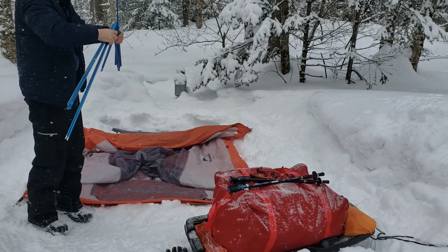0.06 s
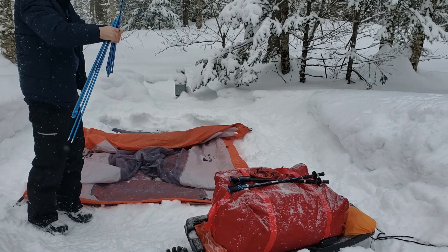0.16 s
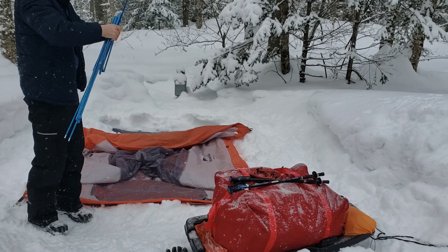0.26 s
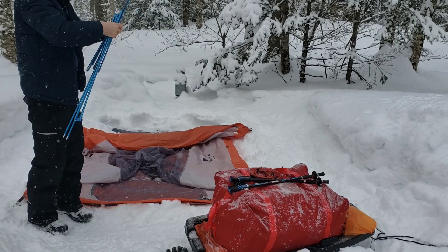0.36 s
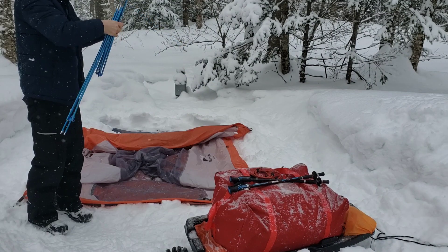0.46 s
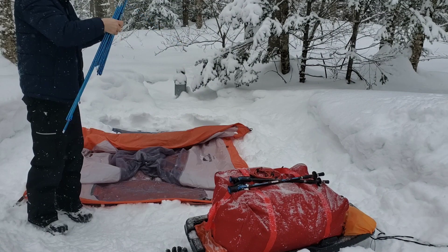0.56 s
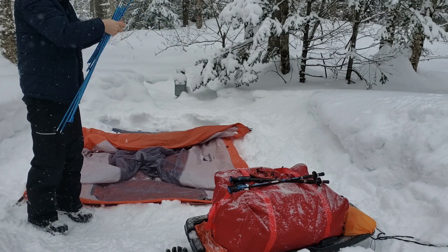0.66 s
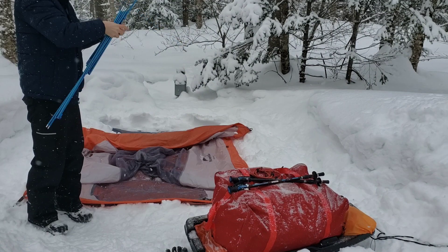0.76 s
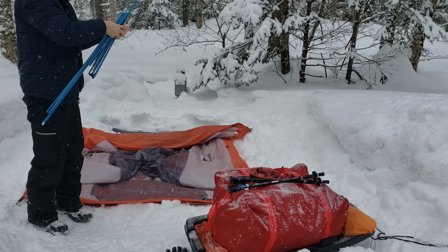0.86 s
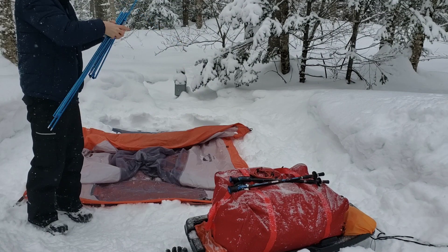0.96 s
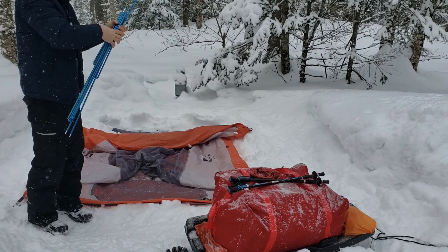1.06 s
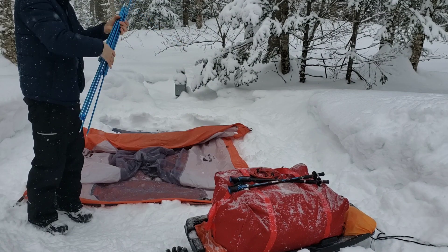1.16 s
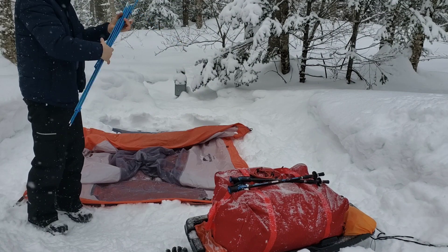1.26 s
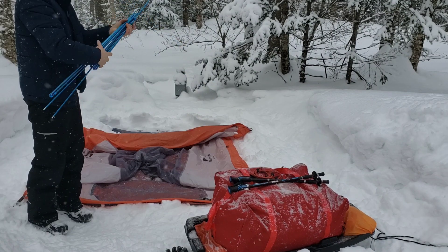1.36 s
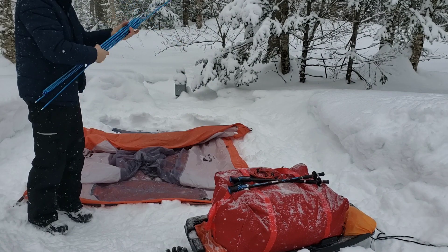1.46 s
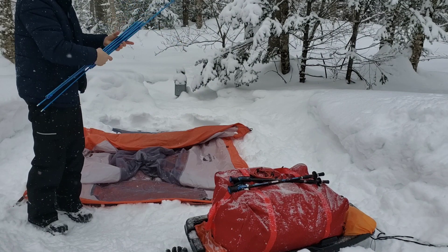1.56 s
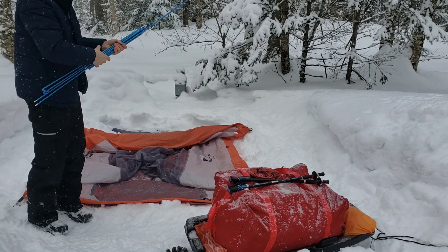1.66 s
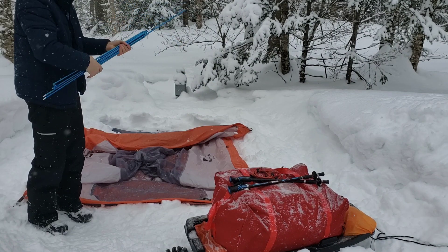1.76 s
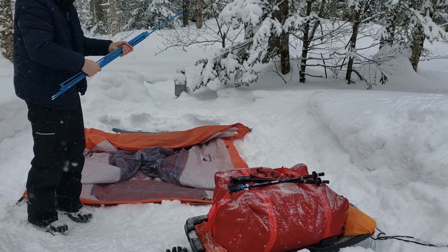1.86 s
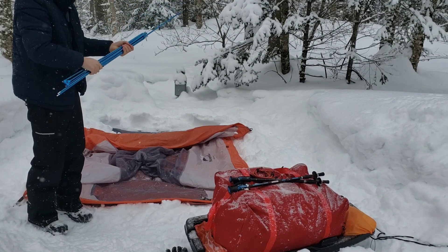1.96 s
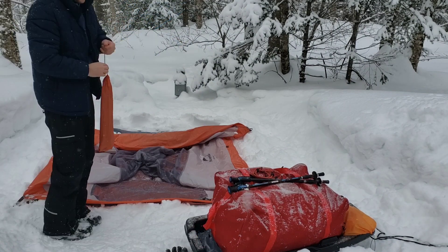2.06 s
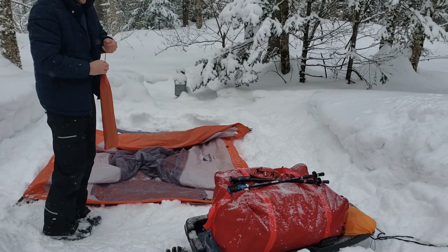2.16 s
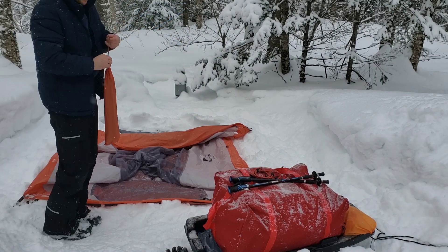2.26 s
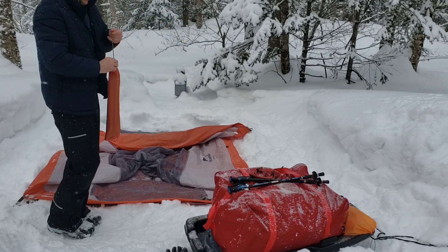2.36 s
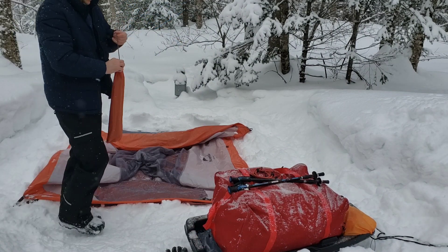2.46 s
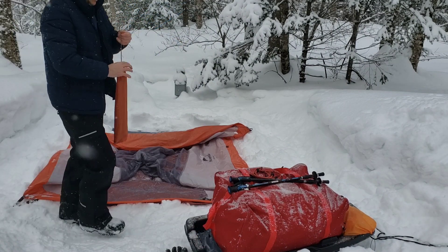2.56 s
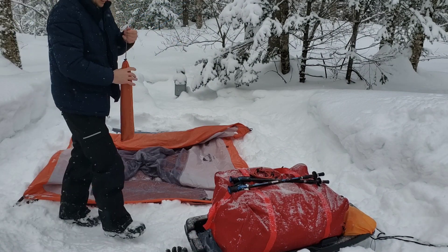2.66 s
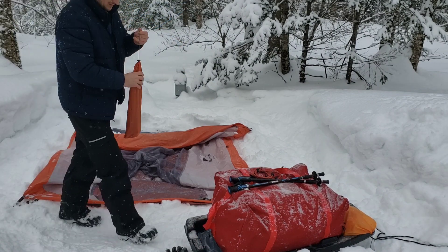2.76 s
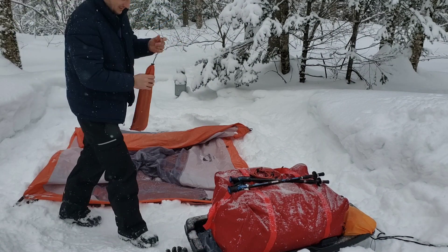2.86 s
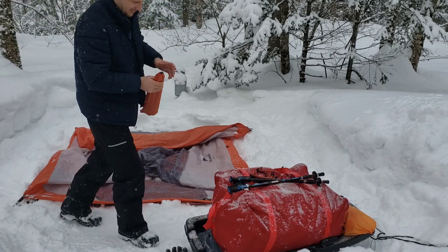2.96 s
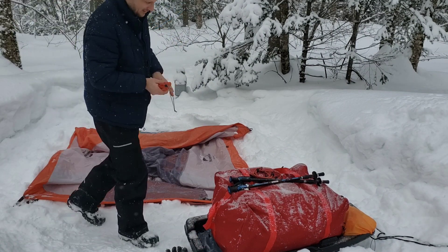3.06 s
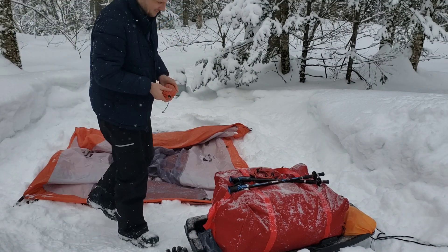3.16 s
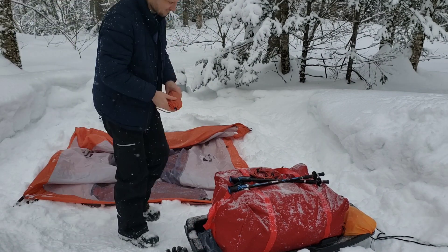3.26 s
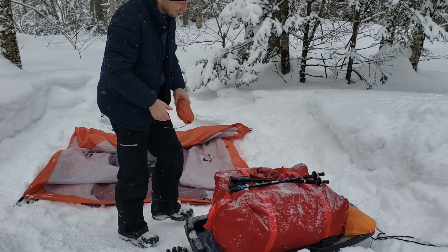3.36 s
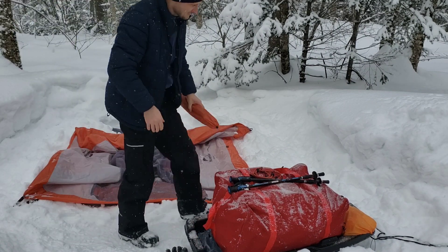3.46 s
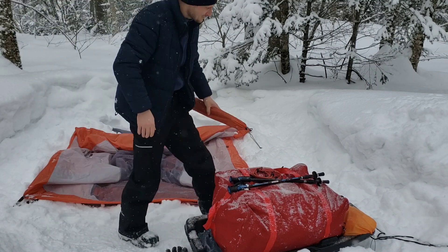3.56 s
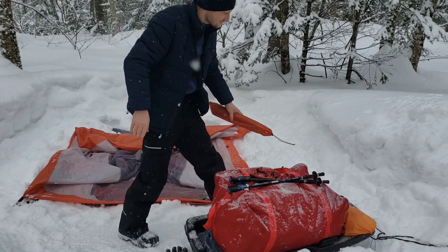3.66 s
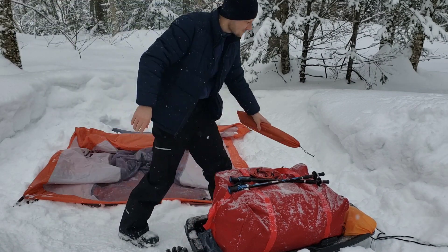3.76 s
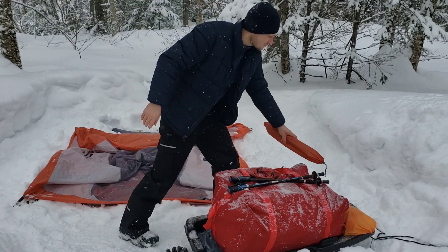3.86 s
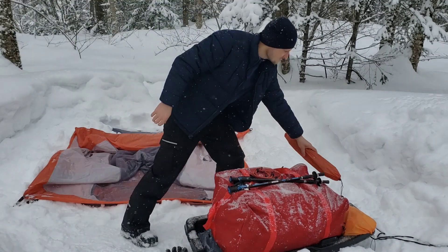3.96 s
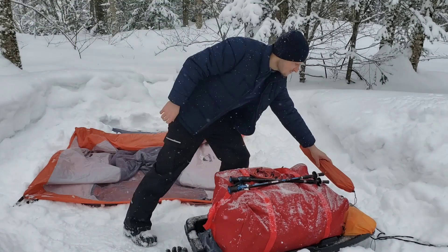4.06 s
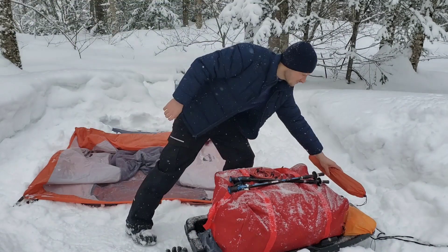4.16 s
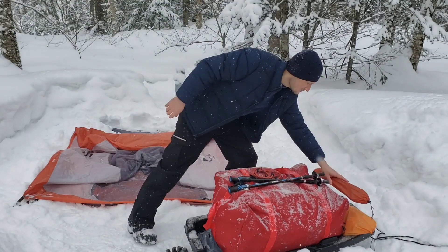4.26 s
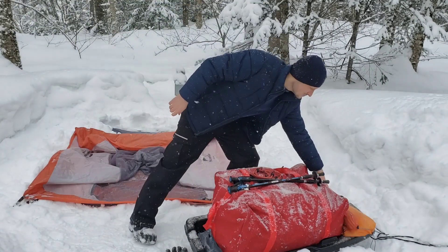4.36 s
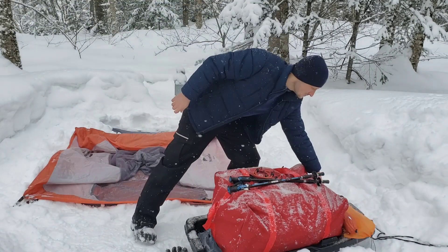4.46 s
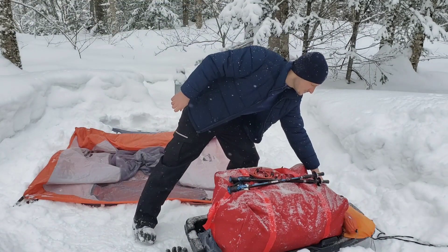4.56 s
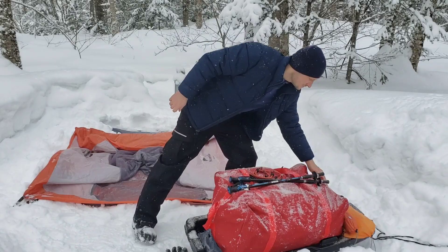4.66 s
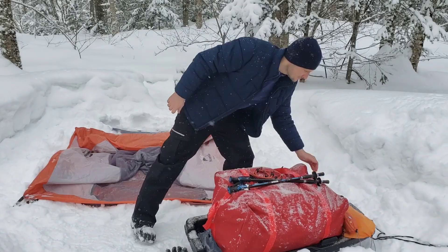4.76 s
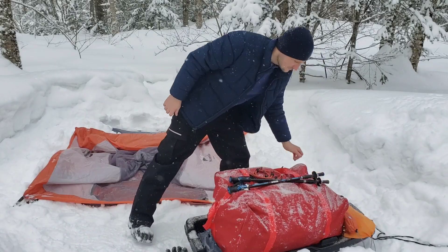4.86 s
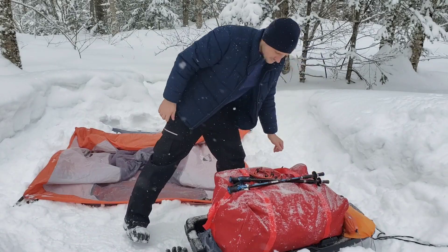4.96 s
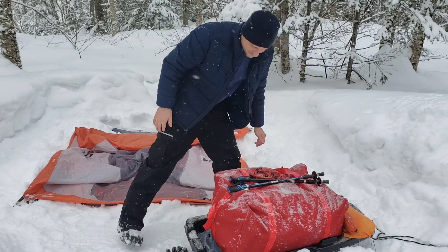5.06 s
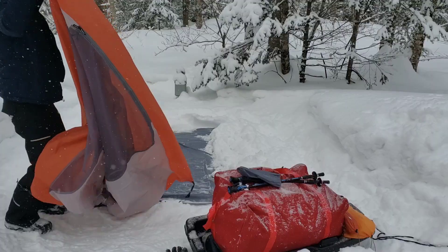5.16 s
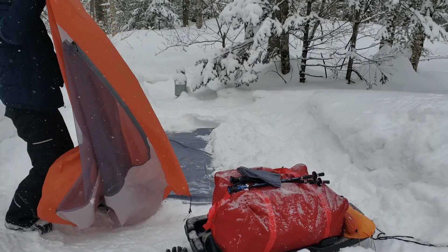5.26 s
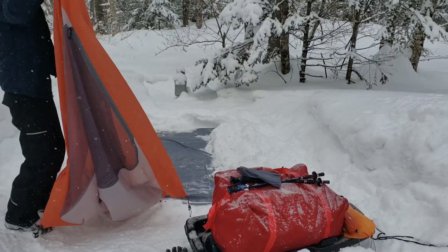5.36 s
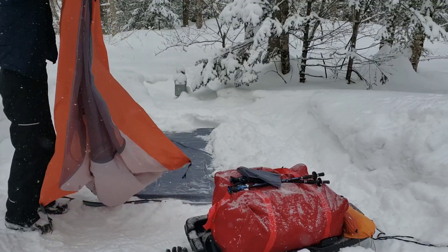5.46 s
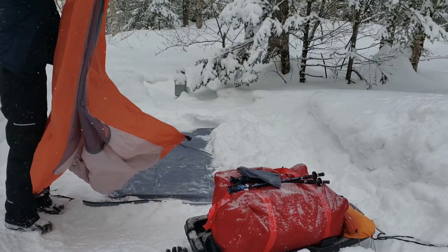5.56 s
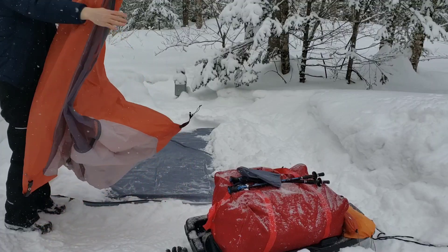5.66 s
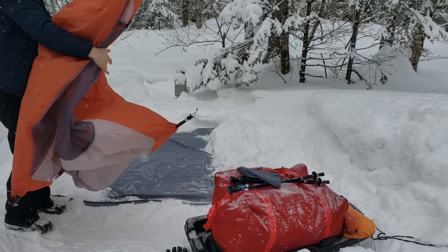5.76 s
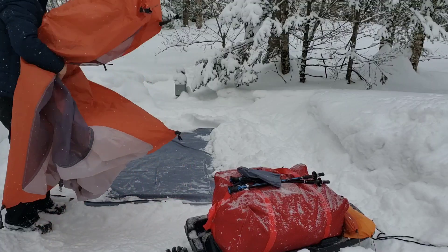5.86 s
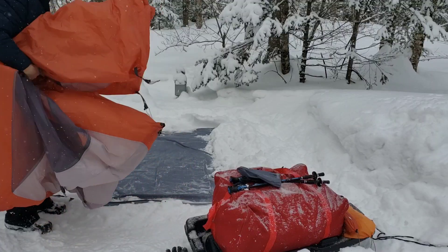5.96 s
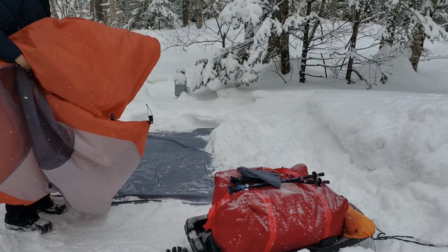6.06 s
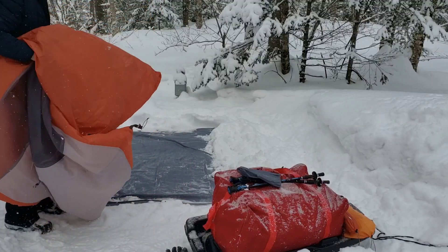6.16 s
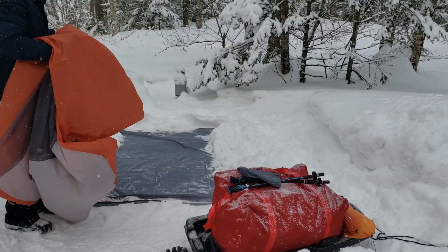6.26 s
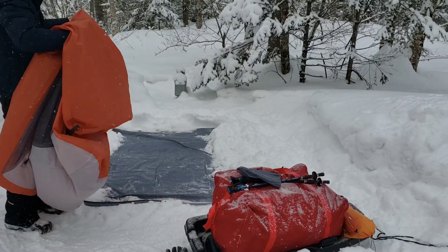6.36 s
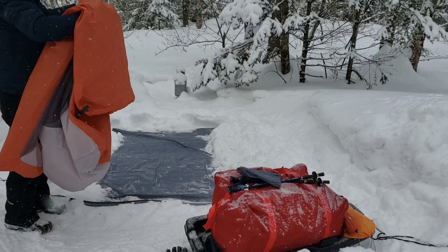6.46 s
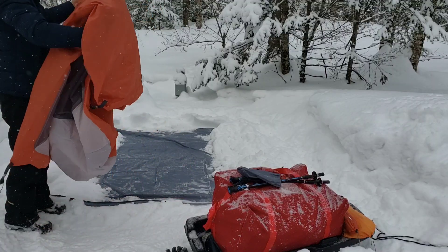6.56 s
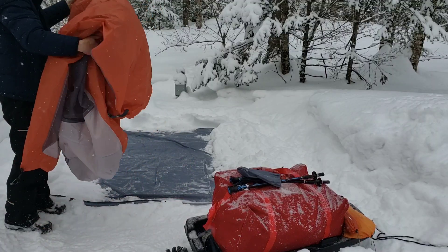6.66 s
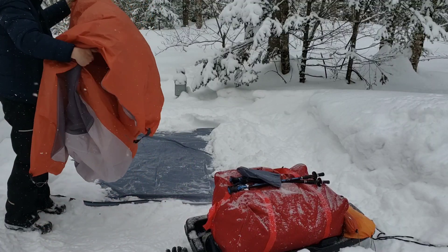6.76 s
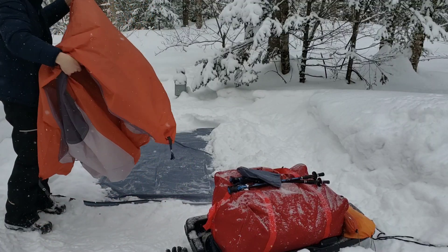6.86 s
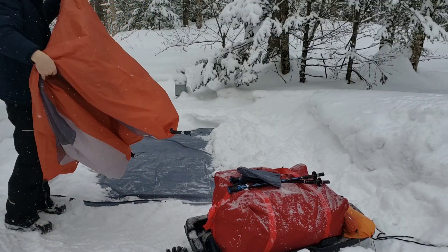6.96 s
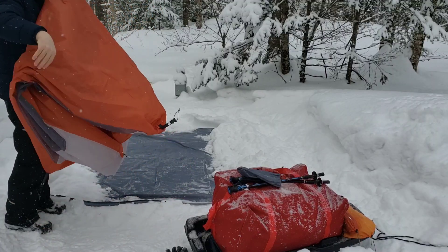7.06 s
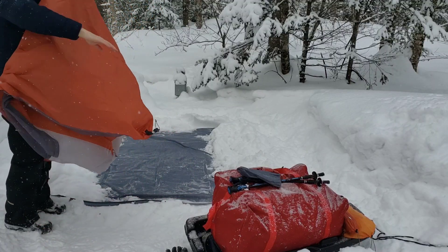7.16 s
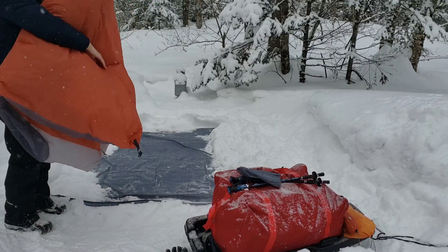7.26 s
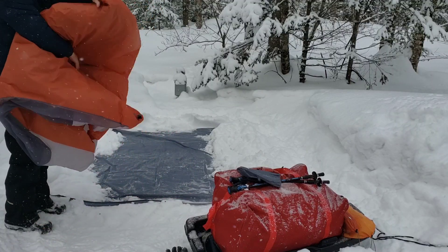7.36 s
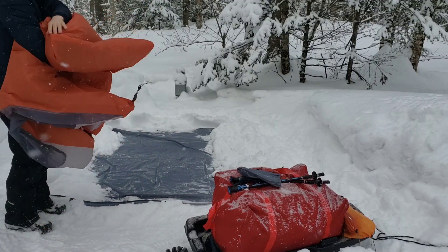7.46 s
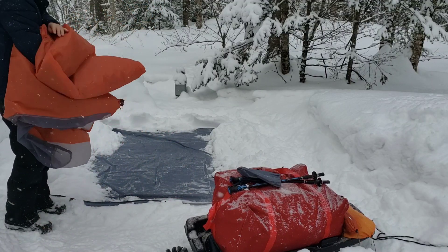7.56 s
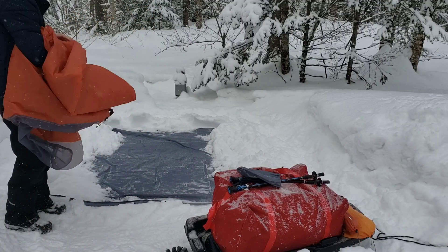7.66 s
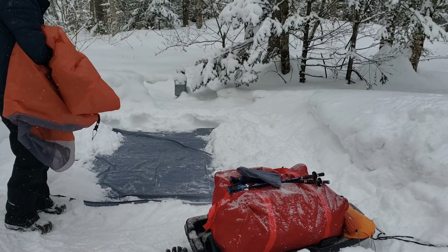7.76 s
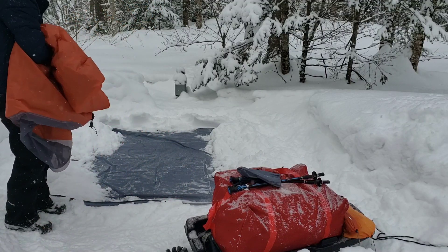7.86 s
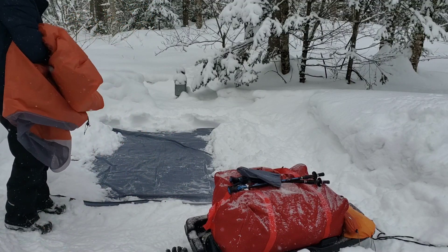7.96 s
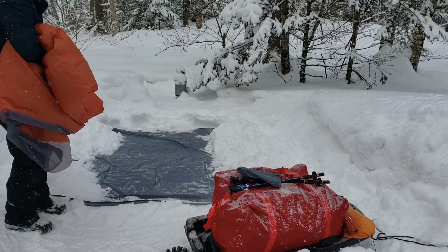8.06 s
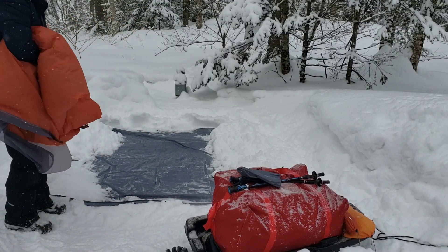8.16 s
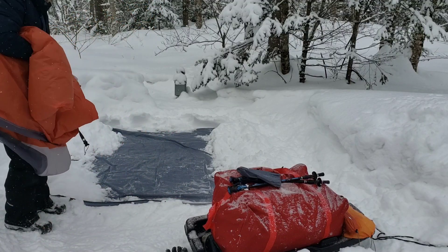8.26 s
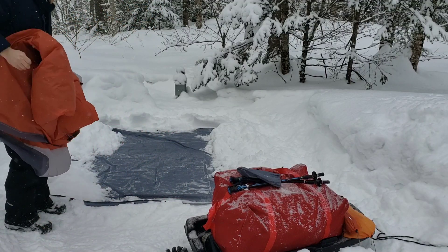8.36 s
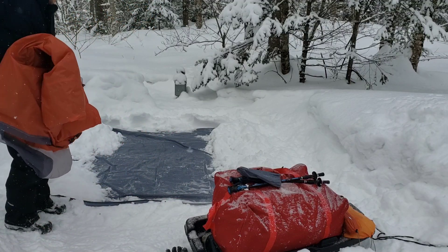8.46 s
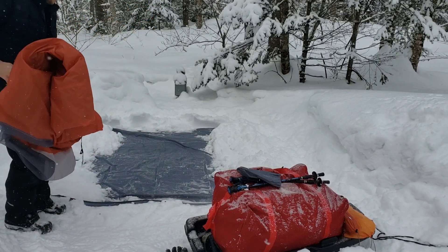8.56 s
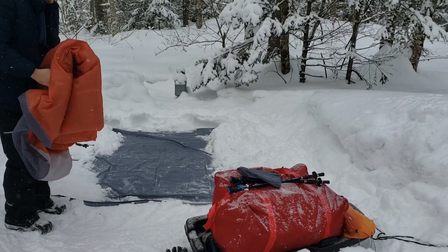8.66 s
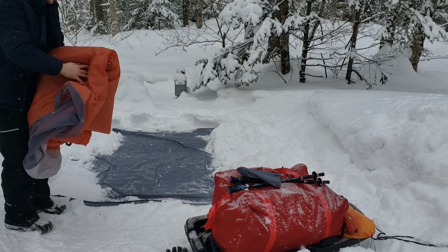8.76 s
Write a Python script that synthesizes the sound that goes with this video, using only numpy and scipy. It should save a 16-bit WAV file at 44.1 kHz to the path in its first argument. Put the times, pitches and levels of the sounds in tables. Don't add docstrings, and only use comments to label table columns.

```python
import sys
import numpy as np
from scipy import signal
from scipy.fft import rfft, irfft, next_fast_len
from scipy.io import wavfile
from scipy.ndimage import uniform_filter1d, map_coordinates

SR = 44100
rng = np.random.default_rng(int(sys.argv[2]) if len(sys.argv) > 2 else 0)


def voltage_ratio(decibels):
    exponent = np.asarray(decibels, float) / 20
    return 10 ** exponent


def log_audio(samples):
    frames = np.atleast_2d(samples).T
    limited = np.clip(frames, -1, 1)
    pcm = np.round(limited * 32767).astype(np.int16)
    wavfile.write(sys.argv[1], SR, pcm)


N = 388080
TENT_FROM_S = 5.112


def unit(x):
    return x / np.sqrt(np.mean(x ** 2) + 1e-20)


def along(points, hz):
    f, v = np.transpose(points)
    return np.interp(np.log(hz + 1), np.log(f + 1), v)


def wobble(rate, size=N):
    knots = rng.standard_normal(int(size * rate / SR) + 4)
    return map_coordinates(knots, [np.arange(size) * rate / SR])


def filtered(x, response):
    m = next_fast_len(x.shape[-1] + 4096)
    spectrum = rfft(x, m) * response(np.fft.rfftfreq(m, 1 / SR))
    return irfft(spectrum, m)[..., :x.shape[-1]]


def coloured(x, response):
    return filtered(x, lambda f: unit(response(f)))


def band(spectrum, lo_hz, hi_hz):
    return lambda f: voltage_ratio(along(spectrum, f)) / np.sqrt((1 + (lo_hz / (f + 1)) ** 6) * (1 + (f / hi_hz) ** 6))


def crackle(rate, spread_db, life, smooth, size=N):
    happens = rng.random(size) < rate / SR
    slips = happens * voltage_ratio(spread_db * np.clip(rng.standard_normal(size), -2, 2))
    fade = np.exp(-1 / (life * SR))
    envelope = smooth + unit(signal.lfilter([1], [1, -fade], slips))
    return envelope * rng.standard_normal((2, size))


def bursts(times, levels_db, rise, t60, tail_db, tail_t60, size=N):
    lead = SR // 200
    t = np.arange(-lead, SR // 12) / SR
    after = np.maximum(t, 0)
    decay = voltage_ratio(-60 * after / t60) + voltage_ratio(tail_db - 60 * after / tail_t60)
    shape = np.exp(np.minimum(t, 0) / rise) * decay
    blows = np.bincount(np.round(times * SR).astype(int), voltage_ratio(levels_db), size)
    envelope = signal.oaconvolve(blows, shape / shape.max())[lead:][:size]
    return envelope * rng.standard_normal((2, size))


def pings(times, levels_db, hz, rise, t60, size=N):
    t = np.arange(-SR // 500, SR // 50) / SR
    shape = np.exp(np.minimum(t, 0) / rise[:, None]) * voltage_ratio(-60 * np.maximum(t, 0) / t60[:, None])
    swing = np.cos(2 * np.pi * (np.outer(hz, t) + rng.random((len(hz), 1))))
    wave = voltage_ratio(levels_db)[:, None] * shape * swing
    at = np.round((times[:, None] + t) * SR).astype(int)
    return np.bincount(at.ravel(), wave.ravel(), size + SR)[:size] * [[1], [.3]]


def swells(s, db, rise, fall):
    t = np.arange(0, N + 32, 32) / SR
    late = t[:, None] - s
    level = db - 20 * np.maximum(late / np.abs(fall), -late / np.abs(rise))
    return np.interp(np.arange(N) / SR, t, level.max(axis=1))


# (frequency [Hz], level [dB per Hz])
POLE_COLOUR = [(290, -56), (500, -28), (594, -32.5), (1490, -27), (2420, -13), (3050, -9), (5250, -4),
               (6510, -3.5), (10000, -13), (15400, -8)]
# (time [s], peak level [dB], bright part [dB])
LOOSE_KNOCKS = [(0.0117, -42.5, -40), (0.026, -24.5, -17), (0.0705, -50, -2), (0.1062, -46.5, -6),
                (0.2205, -44.5, -20), (0.2793, -35, -3), (0.3035, -32, -11), (0.3338, -44, -5),
                (0.3747, -30.5, -9), (0.3937, -41, -1), (0.399, -37, -16), (0.4133, -53, -14),
                (0.4339, -60, -10), (0.4878, -48, -6), (0.5003, -38, -4), (0.5127, -35, 2),
                (0.5592, -35.5, 2), (0.581, -38, -1), (0.6107, -53, 0), (0.729, -54, -1), (0.7835, -65, 16),
                (0.8189, -54.5, 2), (0.8867, -31, 4.5), (0.889, -35, -3.5), (0.8953, -36, -6),
                (0.9059, -47, -5.5), (0.9715, -49, -23), (1.0856, -43.5, 8), (1.1397, -48.5, -2),
                (0.621, -52.5, 3), (1.0135, -37.5, -11), (1.0335, -47, 1), (1.0631, -39, -12),
                (1.0762, -29.5, -5.5), (1.1192, -46, 6), (1.1936, -43, -8)]
# (time [s], peak level [dB], bright part [dB])
BUNDLE_KNOCKS = [(1.2408, -36.5, -8), (1.2647, -35.5, 6.5), (1.2724, -47, 9), (1.2847, -25, 0),
                 (1.319, -34.5, -9), (1.3264, -26.5, 1), (1.3682, -27, -7), (1.383, -45, 2),
                 (1.42, -41, -12), (1.4285, -34, -17), (1.434, -32, 6), (1.4487, -44.5, 6),
                 (1.4733, -50, 14), (1.483, -24.5, -2), (1.512, -41, 3), (1.6675, -51, -4),
                 (1.7156, -43, -3), (1.4858, -29.5, -15), (1.508, -35, 2.5), (1.536, -45, 7),
                 (1.5451, -37, 7), (1.561, -37.5, 6), (1.5757, -28.5, 2.5), (1.581, -31, -6),
                 (1.5953, -43.5, 0), (1.6091, -37.5, 8), (1.7002, -37.5, 3), (1.729, -34.5, -0.5),
                 (1.7523, -36.5, -6), (1.8477, -20, -13.5), (1.8609, -29, -3.5), (1.9328, -29.5, -4)]
# (peak time [s], level [dB], rise [s], fall [s per 20 dB])
STROKES = [(0.025, -55, 0.069, 0.2), (0.274, -45.5, 0.11, 0.17), (0.389, -45.5, 0.036, 0.29),
           (0.512, -35.5, 0.12, 0.07), (0.574, -40.5, 0.15, 0.05), (0.83, -62, 0.25, 5),
           (0.903, -49.5, 0.049, 0.2), (1.078, -55.5, 0.32, 0.2), (1.327, -43.5, 0.098, 0.1),
           (1.502, -53, 1, .27), (1.716, -49.5, 0.12, 0.03), (1.861, -49, 0.02, -0.4),
           (1.941, -50, 0.06, -0.8)]


def poles():
    size, end_s = 2 * SR + SR // 8, 2.018
    s, db, bright_db = np.transpose(LOOSE_KNOCKS + BUNDLE_KNOCKS)
    hollow_db = np.where(s < BUNDLE_KNOCKS[0][0], -20, -12) - 0.73 * (db + 33.5)
    hollow = bursts(s + 0.00057, db + hollow_db - 3.0, rise=0.0006, t60=0.01,
                    tail_db=-5.5, tail_t60=0.11, size=size)
    main = bursts(s + 0.00067, db - 10.5, rise=0.0003, t60=0.019, tail_db=-19.5, tail_t60=0.055, size=size)
    sharp = bursts(s + 0.00073, db + bright_db - 2.0, rise=0.00039, t60=0.016,
                   tail_db=-19.0, tail_t60=.04, size=size)
    knocks = coloured(hollow, band(POLE_COLOUR, 400, 3910))
    knocks = knocks + coloured(main, band(POLE_COLOUR, 3900, 8800))
    knocks = knocks + coloured(sharp, band(POLE_COLOUR, 8800, 17000))
    for low_hz, loss_db in ((5200, 3.7), (6300, 1.5)):
        hz = low_hz * np.exp(0.2 * rng.random(len(s)))
        knocks = knocks + pings(s + 0.0006, db - loss_db, hz, 1.65 / hz, 35 / hz, size=size)
    grit = crackle(rate=900, spread_db=4, life=.0007, smooth=1.2, size=size)
    rattle = crackle(rate=60, spread_db=4, life=.0015, smooth=.01, size=size)
    scrape = unit(coloured(unit(grit) + voltage_ratio(-17) * rattle, band(POLE_COLOUR, 3200, 17000)))
    scrape = scrape * (np.arange(size) < end_s * SR)
    pull_db = swells(*np.transpose(STROKES))[:size] - 7.5 + 2.5 * wobble(70, size)
    return np.pad(knocks + voltage_ratio(pull_db) * scrape, [(0, 0), (0, N - size)])


# (frequency [Hz], level [dB per Hz])
BUFFET_COLOUR = [(12, -37), (20, -10.5), (49, 3.5), (70, 3.5), (88, -3.5), (135, -23), (200, -26.5),
                 (260, -59), (440, -120)]
# (frequency [Hz], level [dB])
HUSH_COLOUR = [(59, -32.5), (100, -1), (205, -9.5), (312, -8.5), (410, -13), (740, -16), (1250, -19.5),
               (1340, -17), (8010, -27), (15400, -22)]
# (peak time [s], level [dB], fall [s per 20 dB])
GUSTS = [(0.115, -60.5, 0.27), (0.6, -65, 1.8), (1.107, -59, 0.27), (1.267, -49, 0.22), (1.7, -63.5, 0.2),
         (1.902, -42.5, 0.1), (1.97, -54, .07), (2.278, -67.5, 0.05), (2.55, -68, 0.1),
         (2.998, -62.5, 0.25), (3.85, -68.5, 1), (4.141, -65.5, 0.6), (4.445, -51.5, 0.13),
         (4.819, -57.5, 0.1), (5.263, -64, 0.1), (5.453, -57, 0.3), (5.807, -58, 0.22), (6.071, -57, 0.27),
         (6.44, -61.5, 0.2), (7.16, -76, 1), (7.343, -52, 0.26), (8.79, -78, 2.5)]


def air():
    lumps = voltage_ratio(np.array([1.0 * wobble(34) + 2.7, 1.3 * wobble(8.4) - 2.5]))
    gusts = rng.standard_normal((2, N)) + 0.83 * rng.standard_normal(N)
    buffet = unit(lumps * coloured(gusts, lambda f: voltage_ratio(along(BUFFET_COLOUR, f))))
    hush = unit(coloured(rng.standard_normal((2, N)), lambda f: voltage_ratio(along(HUSH_COLOUR, f))))
    s, db, fall = np.transpose(GUSTS)
    gust_db = swells(s, db, 0.67 * fall, fall) + 0.5
    hush_db = -78 + 2.0
    return voltage_ratio(gust_db) * buffet + voltage_ratio(hush_db) * hush


# (time [s], low, middle, high tone level [dB], climb of pitch [per s])
RINGS = [
    (0.8865, -44, -42, -44, .1),
    (0.93, -64, -80, -80, .4),
    (1.063, -62, -75, -75, .3),
]
# (frequency [Hz], t60 [s])
TUBE_TONES = [
    (2550, 0.11),
    (5390, .08),
    (7280, .07),
]


def tube():
    ring, t = np.zeros(N), np.arange(SR // 4) / SR
    for s, *levels, climb in RINGS:
        for db, (hz, t60) in zip(levels, TUBE_TONES):
            phase = 2 * np.pi * hz * t * (1 + climb * t) + 1.3 * wobble(200, len(t))
            tone = np.sin(phase) * (1 - np.exp(-t / 0.0006))
            ring[round(s * SR):][:len(t)] += voltage_ratio(db + 6.0 * wobble(90, len(t)) - 60 * t / t60) * tone
    return ring * [[1], [.3]]


# (time [s], length [s], level [dB], hollow [Hz])
SCUFFS = [(1.511, 0.0055, -60, 1310), (1.493, 0.015, -71, 596), (2.396, 0.026, -67, 1560),
          (2.694, 0.0284, -79, 1406), (3.448, 0.046, -60, 385), (3.46, 0.07, -64, 2240),
          (4.646, 0.012, -65, 1900)]


def scuffs():
    out, t = np.zeros((2, N)), np.arange(SR // 4) / SR - 1 / 8
    for s, length, db, hz in SCUFFS:
        hollow = lambda f: 1 / (1 + ((f - hz) / (0.29 * hz)) ** 2)
        rub = coloured(rng.standard_normal((2, len(t))), hollow) * np.exp(-(t / length) ** 2)
        out[:, round(s * SR) - SR // 8:][:, :len(t)] += voltage_ratio(db) * rub
    return out


# (peak time [s], level [dB], rise [s], fall [s per 20 dB], heaviness [dB])
MOVES = [(2.24, -73, 0.032, 0.14, -22), (2.421, -62.5, 0.058, 0.07, -3), (2.814, -66, 0.15, 0.26, -6),
         (2.99, -75, 0.23, 0.9, -10), (3.152, -54.5, 0.021, 0.06, -8.5), (3.278, -62.5, 0.18, 0.28, -6.5),
         (3.44, -57, 0.14, 0.12, -8), (3.504, -58.5, 0.4, 0.0445, -5.5), (3.946, -74, 0.2, 0.35, -16),
         (4.38, -61, 0.12, 0.15, -8), (4.445, -31.5, 0.045, 0.0347, -7.5), (4.512, -62, 0.066, 0.17, -10),
         (4.649, -68, 0.078, 0.05, 4)]
# (peak time [s], level [dB], rise [s], fall [s per 20 dB], heaviness [dB])
HEAVES = [(5.128, -58.5, .02, .55, -3), (5.332, -52, .55, .3, -2), (5.436, -45, .26, .22, 2),
          (5.71, -54, .06, .7, 0), (5.79, -49, .2, .3, 1), (5.953, -45.5, .36, .7, 1),
          (6.062, -46, .35, .5, 2), (6.29, -47.5, .25, .4, -5), (6.422, -49.5, .7, .4, -2),
          (6.717, -54.5, .7, .7, 2), (6.87, -50.5, .5, .4, -1), (7.08, -51.5, .44, .7, 0),
          (7.23, -53, .5, .5, -4), (7.304, -39, .015, .09, 2), (7.327, -43, .04, .3, 5),
          (7.619, -46, .7, .22, -7), (7.93, -57.5, .8, .7, -2), (8.16, -53, .4, .2, 2),
          (8.3, -53, .28, .12, -3), (8.395, -45.5, .24, .03, -12), (8.422, -57.5, .05, .14, 0),
          (8.61, -53, .13, 1.6, 0), (8.788, -47.5, .28, .4, 0)]


def stir(jacket_db, tent_db, grows):
    gains = []
    for over_db, moves in ((jacket_db, MOVES), (tent_db, HEAVES)):
        s, db, rise, fall, heavy_db = np.transpose(moves)
        gains.append(voltage_ratio(over_db + swells(s, db + grows * heavy_db, rise, fall)))
    return np.where(np.arange(N) < TENT_FROM_S * SR, *gains)


# (frequency [Hz], level [dB per Hz])
NYLON_COLOUR = [(120, 7), (200, 4.5), (515, 1), (937, -4.5), (3290, -5.5), (5990, -8), (7180, -5.5),
                (7860, -10.5), (9600, -13.5), (15400, -6.5)]
# (time [s], peak level [dB], body [dB])
TICKS = [(2.234, -50, -20), (2.297, -54, -20), (2.432, -53, -10), (2.694, -52, -12), (2.724, -47, -13),
         (2.8082, -37, -6.5), (2.839, -43, -24), (3.146, -40.5, -24), (3.2644, -46, -7), (3.3057, -44, -23),
         (3.3186, -41, -32), (4.402, -29, -24), (4.4377, -19.5, -20), (4.637, -46, 9), (3.17, -50, -15),
         (3.635, -55, 0.5), (3.645, -60, -13), (3.685, -64, -22), (3.914, -59, -2), (4.069, -65, -24),
         (4.084, -55, -9), (4.381, -46, -25), (4.455, -33, -25), (4.474, -33, -25), (4.626, -53, -25),
         (7.237, -46, -15)]
# (time [s], peak level [dB], body [dB])
SNAPS = [(5.1733, -41.5, 2), (5.4762, -35.5, 0), (5.5899, -39.5, -15), (5.602, -43, -9), (5.7029, -44.5, 8),
         (5.8737, -32.5, -8), (5.953, -41, 2), (6.234, -37, -17), (6.4799, -46, -19), (6.7197, -46, 11),
         (7.299, -26, 8.5), (7.5487, -30.5, -6), (7.6088, -37, -19), (7.7095, -37.5, -0.5),
         (7.799, -46, -8), (7.858, -44, -19), (7.9143, -38, -22), (8.0216, -40, -11), (8.187, -44, 6),
         (8.214, -38.5, -24), (8.3964, -37, -0.5), (8.6041, -38, -13), (8.714, -34.5, 10)]
# (peak time [s], level [dB], rise [s], fall [s per 20 dB])
STRIDES = [(2.97, -62, .1, .15), (3.45, -61, .12, .07), (3.816, -71, .1, .13), (4.14, -71, .15, .12),
           (4.455, -45, .05, .035), (6.05, -53, .25, .12), (7.316, -39, .025, .08), (5.81, -55, .1, .12),
           (8.12, -60, .15, .3), (8.315, -60, .06, .1), (8.4, -56, .05, .05), (8.6, -61, .08, .5)]


def cloth():
    def layer(lo_hz, hi_hz, **slips):
        return unit(coloured(crackle(**slips), band(NYLON_COLOUR, lo_hz, hi_hz)))

    uneven = voltage_ratio(-3.0 + 1.3 * wobble(25))
    hiss = layer(3270, 15800, rate=260, spread_db=-1.5, life=0.0018, smooth=3.9)
    rustle = layer(870, 4020, rate=360, spread_db=3.5, life=0.0012, smooth=2.68)
    flap = layer(324, 935, rate=110, spread_db=6, life=0.0045, smooth=1.76)
    heave = layer(74, 348, rate=36, spread_db=-5.5, life=0.009, smooth=2.5)
    ticks = layer(900, 17000, rate=260, spread_db=3.5, life=.0004, smooth=.01)
    weave = unit(filtered(hiss, lambda f: 1 / (1 + ((f - 6600) / 1500) ** 4)))

    s, db, body_db = np.transpose(TICKS + SNAPS)
    tick = bursts(s + 0.000093, db - 4.5, rise=0.00038, t60=0.0058, tail_db=-9.5, tail_t60=0.046)
    body = bursts(s, db + body_db - 14.5, rise=0.0011, t60=0.02, tail_db=-13.0, tail_t60=0.1)
    snaps = coloured(tick, band(NYLON_COLOUR, 3850, 12300)) + coloured(body, band(NYLON_COLOUR, 1000, 2700))

    fine = stir(-1.9, 0, 0) * (hiss + voltage_ratio(-4.5) * ticks)
    fine = fine + stir(-7.5, -20.5, 0) * weave + stir(0, 0, 0.81) * rustle
    swing = stir(-12, -8.5, 0.49) + voltage_ratio(swells(*np.transpose(STRIDES)))
    late_on = np.arange(N) > 7.75 * SR
    panels = flap + voltage_ratio(-8.0 - 5.5 * late_on) * heave
    return uneven * (fine + swing * panels) + snaps


# (time [s], peak level [dB], pitch [Hz], swings last [s])
THUDS = [(2.962, -60, 155, 0.05), (2.99, -44.5, 142, 0.057), (3.795, -65, 110, .06),
         (3.822, -62, 134, .045), (3.98, -59.5, 95, 0.057), (4.04, -58, 91, .045), (4.116, -54, 105, .065),
         (4.175, -53, 120, .06), (4.412, -53, 198, 0.044), (4.431, -43.5, 146, 0.042),
         (5.089, -54.5, 165.5, 0.038), (5.223, -45, 162, 0.029), (5.265, -45.5, 157, 0.033),
         (5.766, -55, 158, 0.044), (5.815, -53, 160, 0.045), (7.3, -42, 174, 0.041),
         (7.329, -44, 128, 0.046), (8.392, -56.5, 222, 0.034)]
# (time [s], peak level [dB])
CRUNCHES = [(2.914, -67), (2.9242, -64), (3.8, -66.5), (3.843, -67.5), (4.178, -62), (2.9369, -63),
            (2.95, -52), (2.9709, -47), (2.991, -52.5), (3.001, -46), (3.0466, -54.5), (3.8224, -65.5),
            (4.0428, -59), (4.0806, -60), (4.116, -59), (4.13, -65), (5.0895, -56), (5.102, -60)]


def weight():
    out, t = np.zeros(N + SR), np.arange(SR // 8) / SR
    for s, db, hz, last in THUDS:
        swing = np.sin(2 * np.pi * hz * t + rng.uniform(0, 2 * np.pi)) * (1 - np.exp(-t / 0.003))
        out[round(s * SR):][:len(t)] += voltage_ratio(db + 4.0 - 60 * (t / last) ** 2) * swing
    s, db = np.transpose(CRUNCHES)
    crust = bursts(s + 0.00077, db + 2.5, rise=0.00054, t60=0.012, tail_db=-12, tail_t60=0.1)
    return coloured(crust, band([(300, -1.0), (2200, -26.0)], 116, 2100)) + out[:N] * [[1], [.1]]


# (time [s], peak level [dB], pitch [Hz])
POPS = [(5.1735, -52, 1280), (5.267, -53, 500), (5.2901, -48, 1020), (5.3461, -43, 850),
        (5.4275, -35, 1030), (5.4377, -37, 1110), (5.6036, -53, 1190), (5.6756, -47, 690),
        (5.8008, -34, 1150), (5.8239, -39, 720), (5.834, -35, 1120), (5.8992, -32, 990), (5.9261, -30, 960),
        (6.0349, -37, 670), (6.1368, -45, 770), (6.2692, -49, 740), (6.2985, -44, 810), (6.3228, -45, 1060),
        (6.391, -37, 690), (6.3984, -41, 950), (6.4246, -37, 1070), (6.531, -49, 1010), (6.5656, -46, 1130),
        (6.5842, -45, 910), (6.6367, -47, 880), (6.6473, -49, 710), (6.6661, -46, 1200), (6.7, -46, 1040),
        (6.7204, -38, 596), (6.8026, -50, 990), (6.894, -35, 1240), (6.9085, -33, 1070),
        (6.9905, -33, 1020), (7.0596, -42, 890), (7.0764, -46, 600), (7.1016, -46, 1090),
        (7.3071, -24, 1100), (7.315, -22, 820), (7.3217, -26, 800), (7.5843, -46, 820), (7.6115, -51, 1020),
        (7.711, -45, 810), (7.7774, -51, 710), (7.929, -50, 1130), (7.9641, -51, 1070), (7.9757, -51, 1030),
        (8.0688, -48, 1130), (8.1049, -46, 800), (8.1277, -42, 790), (8.1443, -45, 760), (8.1767, -45, 710),
        (8.1932, -44, 660), (8.3144, -51, 650), (8.3908, -44, 970), (8.3982, -45, 600), (8.4249, -43, 680),
        (8.608, -47, 680), (8.7137, -38, 1320), (8.733, -37, 870), (8.779, -39, 790)]


def buckles():
    s, db, hz = np.transpose(POPS)
    clear = pings(s, db - 2.5, hz, 0.32 / hz, 3.9 / hz)
    when, size, pitch = rng.random((900, 3)).T
    s = TENT_FROM_S + when * (N / SR - TENT_FROM_S)
    hz = 420 * np.exp(1.6 * pitch)
    crowd = pings(s, np.minimum(-4.0 * np.log(size), 9.0), hz, 0.31 / hz, 2.9 / hz)
    return clear + voltage_ratio(-8.0) * stir(-6, 0, 0.45) * crowd


# (from time [s], left port leads [ms], share of left-hand shading [0-1])
SPOTS = [(0, 0.14, 0.77), (2.019, 0.14, 0.47), (3.002, 0.023, 0.8), (3.701, 0.015, 0.35), (4.2, -0.12, 0.2),
         (5.1, 0.15, 0.9), (7.5, 0.16, 0.9)]
# (frequency [Hz], likeness [0-1])
ALIKE = [(100, 1), (1000, 0.84), (3000, 0.85), (7000, 0.41), (15000, 0.43)]
# (frequency [Hz], left over right [dB])
FROM_LEFT = [(100, 1.5), (1300, 4.5), (4400, 6), (7500, 9.5), (10000, -4.5), (15000, -3)]
# (frequency [Hz], left over right [dB])
FROM_RIGHT = [(100, -1.5), (1300, 6.5), (5000, 2), (7200, 15), (10300, -9), (15000, -14.5)]


def ports(pair, patchy_db, wander_ms):
    f, t, (direct, twin) = signal.stft(pair, SR, nperseg=512)
    start, lead_ms, share = np.transpose(SPOTS)
    spot = np.searchsorted(start, t, side="right") - 1
    wander = wander_ms * wobble(6)[np.minimum(t * SR, N - 1).astype(int)]
    lead = (lead_ms[spot] + wander) / 1000
    shade_db = np.outer(along(FROM_LEFT, f), share[spot]) + np.outer(along(FROM_RIGHT, f), 1 - share[spot])
    field = uniform_filter1d(rng.standard_normal(direct.shape), size=7, axis=0)
    field = uniform_filter1d(field, size=6, axis=1)
    turn = np.arccos(np.clip(along(ALIKE, f), 0, 1))[:, None] / 2
    ear = np.array([1, -1])[:, None, None]
    gain = voltage_ratio(ear * shade_db / 2 + patchy_db * unit(field))
    path = gain * np.exp(1j * ear * np.pi * np.outer(f, lead))
    heard = path * (np.cos(turn) * direct + ear * np.sin(turn) * twin)
    return signal.istft(heard, SR, nperseg=512)[1][:, :N]


def scene():
    camper = poles() + tube() + scuffs() + cloth() + weight() + buckles()
    return voltage_ratio(1.5) * ports(camper, patchy_db=0.77, wander_ms=0.026) + air()


# (frequency [Hz], level [dB])
EDGE = [(15500, 0), (15750, -30.5), (16700, -37), (16850, -68.5)]


def top_end(x):
    return filtered(x, lambda f: voltage_ratio(along(EDGE, f)))


def low_pass(x):
    return signal.sosfilt(signal.butter(12, 16810, fs=SR, output="sos"), x)


def record(dry):
    mix = top_end(dry)
    return low_pass(mix)


dry = scene()
out = record(dry)
log_audio(out)
```